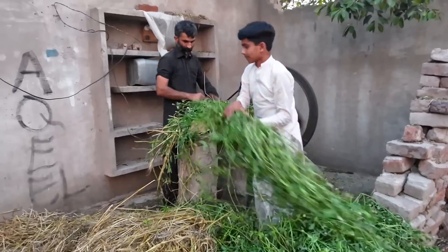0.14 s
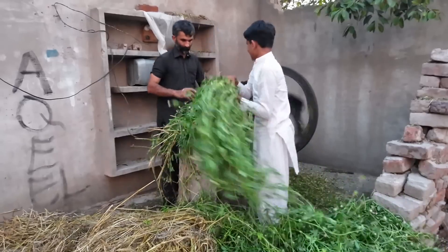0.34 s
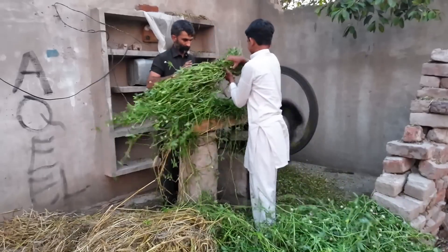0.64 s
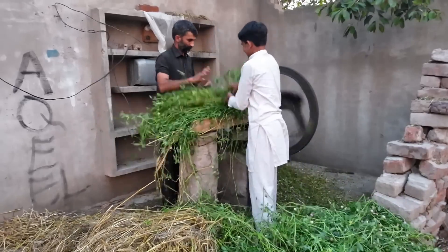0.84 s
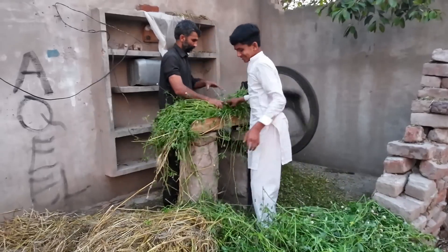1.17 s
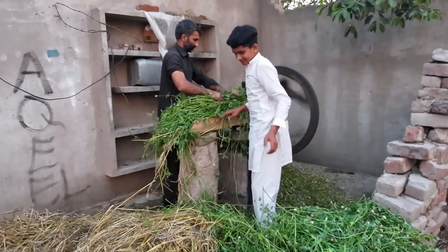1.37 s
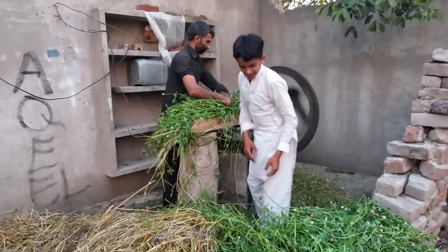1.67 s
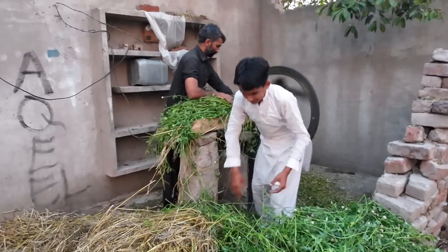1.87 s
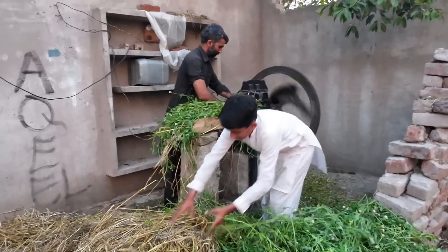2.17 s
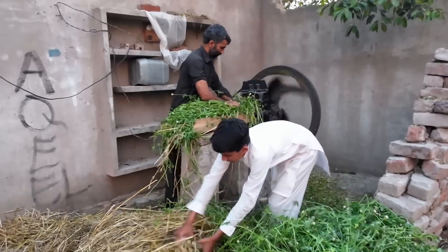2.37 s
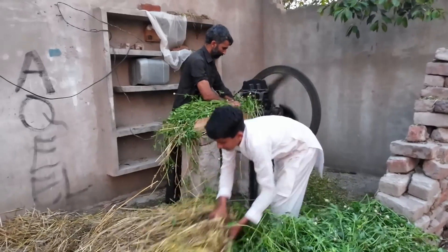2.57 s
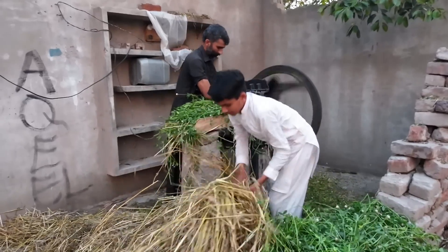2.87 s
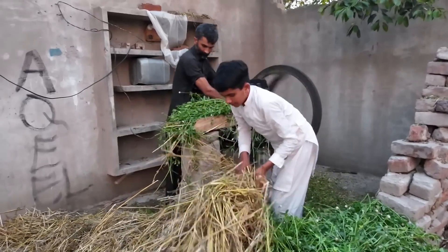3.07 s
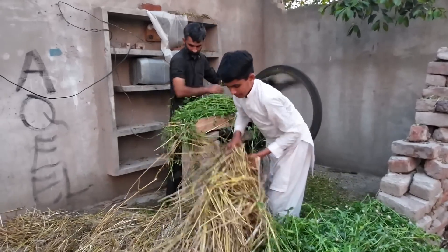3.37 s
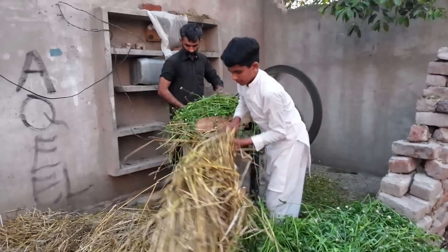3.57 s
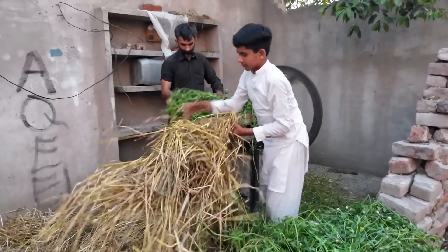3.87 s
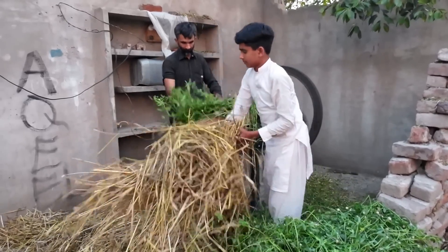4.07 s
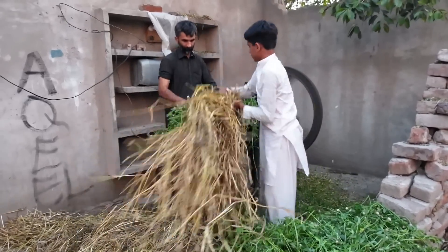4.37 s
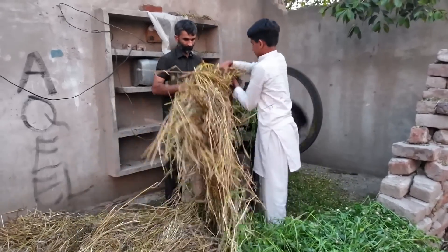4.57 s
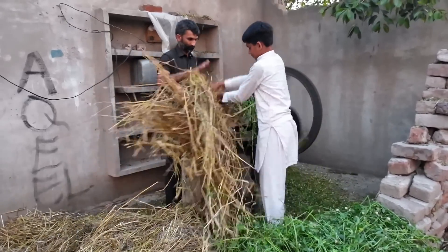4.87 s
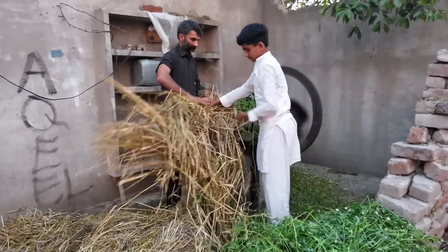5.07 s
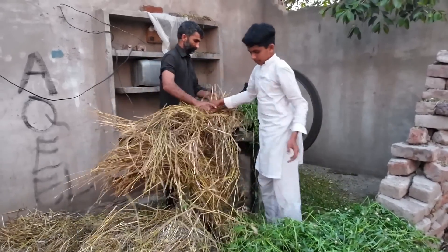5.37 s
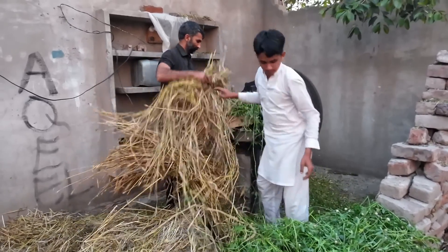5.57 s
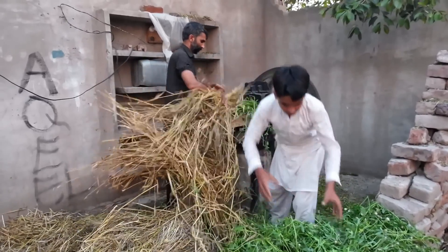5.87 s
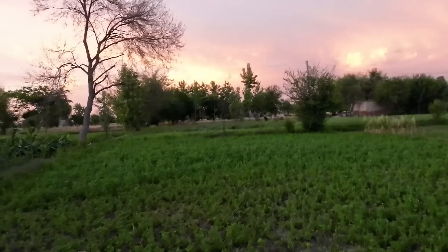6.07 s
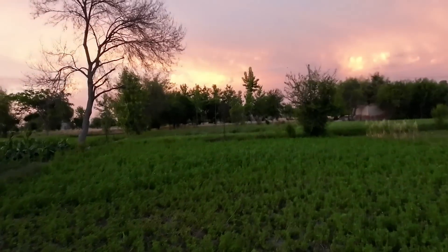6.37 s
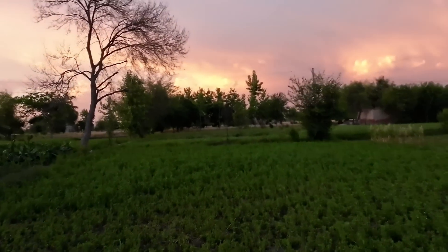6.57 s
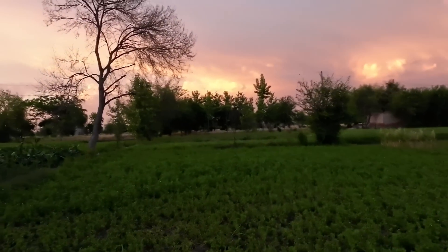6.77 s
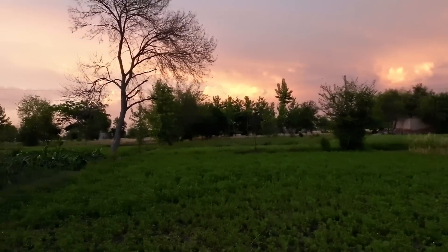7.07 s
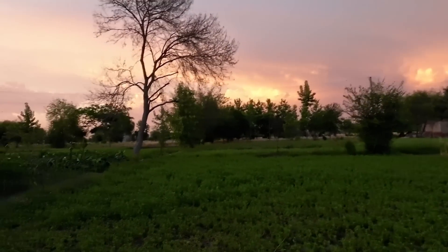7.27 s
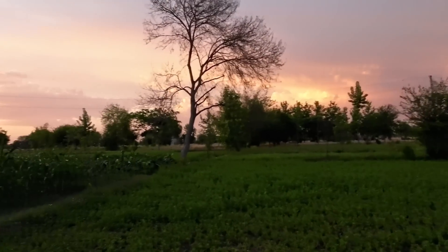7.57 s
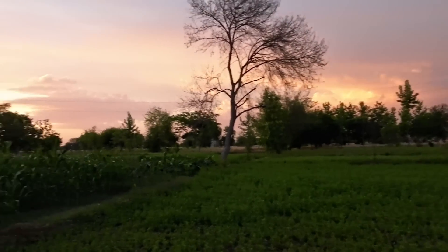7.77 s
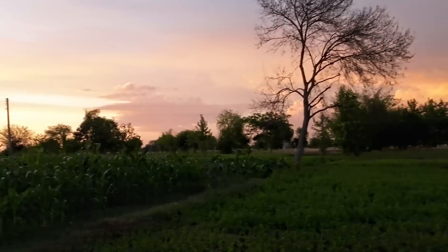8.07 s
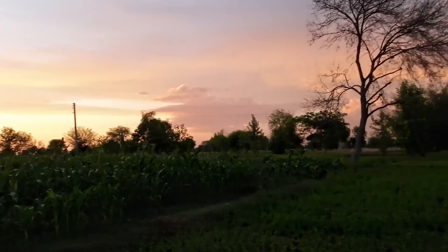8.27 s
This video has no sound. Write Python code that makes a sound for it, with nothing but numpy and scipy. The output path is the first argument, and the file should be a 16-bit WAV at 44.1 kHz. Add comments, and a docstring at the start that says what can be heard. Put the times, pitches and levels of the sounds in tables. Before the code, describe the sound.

Close in a walled yard, a motorised fodder cutter runs at six even strokes a second: crisp slice, iron knock, coarse crunch, gear clack, over a low rumble. Dry straw rustles as it is lifted, and the knocks grow harder. Then it cuts abruptly to a much quieter field with hoarse dog barks, faint hoots, thin bird chirps, a far-off cutter throb and light low wind on the microphone.

```python
"""A motor-driven flywheel chaff cutter in a walled yard: two knives give six strokes a second. Each slices into
the stalks (green fodder, then straw), knocks on the iron mouth and crunches on; the feed gears clack in between.
Filtered grains of noise, shaped stroke by stroke, make these sounds; straw rustles as it is moved.
Then the scene cuts to an open field at dusk: a barking dog built from voice harmonics, birds and hoots as
gliding sines, and noise for the air, a far-off cutter, small touches and the light wind heard throughout."""
import sys
import numpy as np
from scipy import signal
from scipy.fft import rfft, irfft
from scipy.io import wavfile
from scipy.ndimage import uniform_filter1d

SR = 44100
rng = np.random.default_rng(int(sys.argv[2]) if len(sys.argv) > 2 else 0)


def pcm_store(signal):
    """Save signal as 16-bit PCM."""
    levels = np.round(np.clip(np.atleast_2d(signal), -1, 1) * 32767)
    wavfile.write(sys.argv[1], SR, levels.astype(np.int16).T)


N = 371308
TIME = np.arange(N) / SR
FIELD_FROM_S = 6.347  # the yard cuts to the field


def undb(db):
    """Decibels to gain."""
    return 10 ** (np.asarray(db) / 20)


def unit(x):
    """Scale to rms 1."""
    return x / np.sqrt(np.mean(x ** 2))


def curve(rows):
    """Gain over time from (time_s, level_db) rows."""
    return undb(np.interp(TIME, *np.transpose(rows)))


def colour(x, points, modes=(), size=32768):
    """Minimum-phase filter through (freq_hz, gain_db) points; (freq_hz, width_hz, gain_db) modes ring on top."""
    f = np.arange(size // 2 + 1) * SR / size + 1e-3  # the offset avoids log(0)
    hz, db = np.transpose(points)
    gain = undb(np.interp(np.log(f), np.log(hz), db))
    # folding the cepstrum forward makes the filter causal
    cepstrum = irfft(np.log(gain))
    cepstrum[1:size // 2] *= 2
    cepstrum[size // 2 + 1:] = 0
    ring = 1 + sum(undb(d) / (1 + 1j * (f * f - c * c) / (f * w)) for c, w, d in modes)
    response = irfft(np.exp(rfft(cepstrum)) * ring)[:size // 2]
    return signal.oaconvolve(x, np.array(response, ndmin=x.ndim), axes=-1)[..., :N]


def walk(rate):
    """Smooth random wandering around 0 at rms 1, with so many new targets a second."""
    hold = max(int(SR / rate), 1)
    steps = np.repeat(rng.standard_normal(N // hold + 1), hold)
    return unit(uniform_filter1d(steps, hold)[:N])


def grains(rate, spread_db, hiss):
    """Tiny breaks of uneven size, so many a second, over a hiss of finer ones."""
    sizes = undb(spread_db * np.minimum(rng.exponential(size=N), 4))
    signed = sizes * rng.choice([-1, 1], N)
    breaks = signed * (rng.random(N) < rate / SR)
    return unit(breaks) + hiss * rng.standard_normal(N)


def bursts(rows, decay_s, points, modes=()):
    """Short crushing contacts, quick runs of tiny hits that die away in a resonant body."""
    force = np.zeros(N)
    for start_s, level_db in rows:
        near = slice(*np.searchsorted(TIME, [start_s, start_s + 10 * decay_s]))
        force[near] += undb(level_db) * np.exp((start_s - TIME[near]) / decay_s)
    hits = rng.choice([-1., 1.], N) * (rng.random(N) < .25)
    return colour(hits * force, points, modes) / np.std(colour(hits, points, modes))


def hollow(x, ring_db, low_hz, high_hz, width_hz, count=12):
    """Hollow stalks and pockets in the bundle resonate briefly, each at its own random moments."""
    out = x
    for hz in np.geomspace(low_hz, high_hz, count):
        ring = signal.lfilter(*signal.iirpeak(hz, hz / width_hz, fs=SR), x)
        opening = np.maximum(walk(22) - .5, 0)
        out = out + undb(ring_db) * opening * ring
    return unit(out)


# steady flywheel: first stroke, time from one knife to the next; random scatter of timing and of relative hold
FIRST_STROKE_S, STROKE_S = .0675, .16405
TIMING_SCATTER_S, HOLD_SCATTER = 0.0013, 0.074


def each_stroke(times, levels_db, start_s, attack_s, hold_s, release_s, sag_db_per_s, level_db, scatter_db):
    """Attack, sagging hold and release at every stroke, with scattered timing, hold and level.

    start_s counts from the knife's entry, release_s is a 60 dB fall, a pair of sags is (deep, shallow) knife.
    """
    gain, sags = np.zeros(N), np.resize(sag_db_per_s, len(times))
    scatter = rng.standard_normal((len(times), 3))
    for s, db, sag, (late, longer, louder) in zip(times, levels_db, sags, scatter):
        near = slice(*np.searchsorted(TIME, [s - STROKE_S, s + 2 * STROKE_S]))
        after = TIME[near] - s - start_s - TIMING_SCATTER_S * late
        held = np.maximum(after - attack_s, 0)
        released = np.maximum(held - hold_s * (1 + HOLD_SCATTER * longer), 0)
        rise = np.sin(np.pi / 2 * np.clip(after / attack_s, 0, 1)) ** 2
        fall = np.exp(-np.log(1000) * released / release_s)
        gain[near] += rise * undb(level_db + db + scatter_db * louder - sag * held) * fall
    return gain


# level of the whole cutter, fading just before the cut to the field: time_s, level_db
CUTTER_LEVEL = [(6.25, -2), (6.275, -5.5), (6.346, -14.5)]
# thickness of the bundle under the knives, as the force of the knock: time_s, force_db
BUNDLE = [(0, .5), (.9, .5), (1.9, -3.5), (2.6, 0.5), (3.05, -1), (3.8, 2), (4.7, 5), (5.1, -1), (6.2, -4)]
# load on the feed gears, slack while the green fodder runs out: time_s, load_db
GEAR_LOAD = [(0, 1.5), (.8, 3), (1.7, 1), (1.95, -9), (2.9, -7.5), (3.3, .5), (5.8, 2.5), (6.2, -6)]
# share of dry straw in the feed: time_s, share (0-1)
DRYNESS = [(3.7, 0), (4.1, 0.94)]
# ringing of the iron frame and feed trough: freq_hz, width_hz, gain_db
FRAME = [(117.4, 28, -2), (175, 14, -7), (231.6, 46, -2.5), (390, 49, -3), (568, 50, 2), (670, 45, -9),
         (939, 85, -2), (1050, 80, -9)]
DRY_BITE_DB = 0.95  # in straw one knife bites deeper, the other shallower


def cutter():
    """Two knives strike in turn through the bundle while the gears and the machine run on."""
    count = np.arange(-1, (FIELD_FROM_S - FIRST_STROKE_S) / STROKE_S)  # the wheel is already turning
    times = FIRST_STROKE_S + STROKE_S * count
    knife = np.where(count % 2, 1, -1)  # +1 for the deep knife, -1 for the shallow one
    bundle_db, load_db, dryness = (np.interp(times, *np.transpose(rows)) for rows in (BUNDLE, GEAR_LOAD, DRYNESS))
    bite_db = knife * DRY_BITE_DB * dryness
    force_db = bundle_db + bite_db
    strokes = (slicing(times, bite_db, dryness) + knocking(times, force_db)
               + crunching(times, force_db) + clacking(times, load_db, knife))
    return (strokes + running() + blows()) * curve(CUTTER_LEVEL)


# blade parting the stalks: freq_hz, gain_db
SLICE = [(200, -10), (600, -1.5), (2400, 1), (3500, 0.5), (4400, -3.5), (5200, 2), (6500, -5.5), (8000, -4),
         (9100, -8), (9900, 0.5), (11000, -13), (16000, -12)]
SLICING = dict(start_s=-.006, attack_s=.028, hold_s=.064, release_s=.066,
               sag_db_per_s=(48, 98), level_db=-24, scatter_db=0.44)
DRY_SLICE_DB = -1.4  # straw hisses less under the knife


def slicing(times, bite_db, dryness):
    """Stalks part under the knife in a dense crackle; hollow ones ring."""
    crackle = colour(grains(rate=6000, spread_db=2.5, hiss=.5), SLICE, FRAME)
    stalks = hollow(crackle, ring_db=-3, low_hz=1540, high_hz=8030, width_hz=450)
    density = undb(1.74 * walk(45))  # denser places swell within a stroke
    return stalks * density * each_stroke(times, bite_db + DRY_SLICE_DB * dryness, **SLICING)


# knife blow in the iron mouth: freq_hz, gain_db
KNOCK = [(120, -12.5), (300, -16.5), (480, 3), (700, 4), (950, -6.5), (1400, -4), (3000, -7.5),
         (8000, -40.5)]
KNOCKING = dict(start_s=.02, attack_s=.028, hold_s=.014, release_s=0.093,
                sag_db_per_s=(5, 140), level_db=-24.5, scatter_db=1.2)


def knocking(times, force_db):
    """The knife's blow on the iron mouth rings the frame, harder on a thicker bundle."""
    knock = unit(colour(grains(rate=1400, spread_db=0.5, hiss=.3), KNOCK, FRAME))
    return knock * each_stroke(times, force_db, **KNOCKING)


# stalks crushed and broken: freq_hz, gain_db
CRUNCH = [(80, -6), (160, -11), (230, 0), (320, -2), (500, -1.5), (1050, 0.5), (1500, 1), (2600, -1.5),
          (4200, -8), (10000, -23)]
CRUSHING = dict(start_s=0.0032, attack_s=.026, hold_s=0.028, release_s=.06,
                sag_db_per_s=30, level_db=-29.5, scatter_db=1)
CRUNCHING = dict(start_s=.054, attack_s=.018, hold_s=.024, release_s=.125,
                 sag_db_per_s=18, level_db=-22.9, scatter_db=0.95)
CRUNCH_SHARE = 0.24  # share of the knock's force, in dB, that the crunch follows


def crunching(times, force_db):
    """The bundle is crushed as the knife enters, then crunches through the rest in coarse breaks."""
    breaks = colour(grains(rate=1500, spread_db=1.0, hiss=0.39), CRUNCH, FRAME)
    stalks = hollow(breaks, ring_db=-0.5, low_hz=692, high_hz=2560, width_hz=100)
    density = undb(1.2 * walk(80))
    breaking = sum(each_stroke(times, CRUNCH_SHARE * force_db, **part) for part in (CRUSHING, CRUNCHING))
    return stalks * density * breaking


# feed gears: freq_hz, gain_db
CLACK = [(60, -7.5), (120, 0.5), (240, 1), (330, -7), (560, 2.5), (950, 1.5), (1300, -6.5), (1900, -7),
         (3000, -18.5), (8000, -48)]
CLACKING = dict(start_s=.131, attack_s=.006, hold_s=.017, release_s=.05,
                sag_db_per_s=30, level_db=-28.7, scatter_db=.9)
GEAR_LIMP_DB = 1.55  # harder after the shallow knife, softer after the deep one


def clacking(times, load_db, knife):
    """The feed gears clack between the strokes and ring the frame, louder under load."""
    clack = unit(colour(grains(rate=700, spread_db=1.1, hiss=0.19), CLACK, FRAME))
    return clack * each_stroke(times, load_db - GEAR_LIMP_DB * knife, **CLACKING)


# hard knocks of the knife on a thick bundle: start_s, level_db
BANGS = [(3.199, -23), (4.225, -20), (4.556, -15), (4.876, -11.5), (5.204, -17)]
# feed gears catching and clunking hard: start_s, level_db
CLUNKS = [(.537, -24.5), (.867, -18.5), (1.186, -21.5), (5.116, -24), (5.783, -19), (6.116, -22)]
# thick stalks snapping: start_s, level_db
SNAPS = [(.652, -20), (1.118, -14.5), (2.101, -17), (2.291, -16), (2.621, -20), (2.765, -18), (2.943, -20),
         (4.902, -12.5), (5.227, -15.5), (6.227, -16.5)]
# body of a snapping stalk, also of small ticks in the plants: freq_hz, gain_db
SNAP = [(300, -9), (1000, 7), (3000, 4), (6000, -7), (10000, -6), (16000, -33)]


def blows():
    """Single hard contacts: knife bangs and gear clunks ring the frame, stalks snap without it."""
    bangs = bursts(BANGS, 0.01, KNOCK, FRAME)
    clunks = bursts(CLUNKS, .013, CLACK, FRAME)
    return bangs + clunks + bursts(SNAPS, 0.0045, SNAP)


# motor, belt and bearings: freq_hz, gain_db
RUNNING = [(24, -34), (40, -4), (313, -13.5), (565, -4.5), (776, -15), (945, -8), (6710, -25.5),
           (9930, -24), (11200, -26), (12100, -78), (14000, -65)]


def running():
    """Motor, belt and bearings rumble on through the frame with a wavering level."""
    rumble = unit(colour(grains(rate=2000, spread_db=3.5, hiss=0.84), RUNNING, FRAME))
    return undb(-34.0 + 1.8 * walk(25)) * rumble


# dry straw being gathered and lifted: time_s, level_db (the middle of its fits)
STRAW_LEVEL = [(2.2, -70), (2.45, -45), (2.85, -38), (3.15, -50), (4.6, -41), (5.3, -57)]
# brightness of the dry stems: freq_hz, gain_db
STRAW = [(800, -20), (3000, -14), (9000, 6), (15000, 7)]


def straw():
    """Dry stems rustle brightly in fits as an armful is moved."""
    stems = grains(rate=900, spread_db=3, hiss=.7)
    return unit(colour(stems, STRAW)) * curve(STRAW_LEVEL) * undb(2.0 * walk(12))


# barks: peak_s, spread_s (time scale either side of the peak), pitch_hz, level_db, roughness (0-1), mouth_hz
BARKS = [(7.058, 0.075, 645, -30.5, 0.57, 1350), (7.26, .11, 578, -31, 0.64, 1120),
         (7.425, 0.076, 544, -34.5, 0.51, 1050), (7.452, .036, 1075, -28.5, 0.17, 1070),
         (7.73, .095, 555, -38, 0.77, 1100), (8.281, 0.039, 730, -40.5, 0.6, 740)]
# throat resonance, for both harmonics and breath: freq_hz, gain_db
THROAT = [(250, -13), (600, -4), (850, -2.5), (1200, -4), (1700, -4), (2100, -16.5), (2700, -12),
          (4000, -37), (8000, -25), (12000, -44)]


def dog(arch=.08, droop=.45, hoarse=0.0905, mouth_width_hz=260, mouth_db=10.0):
    """Each bark swoops up and drops away; hoarse, uneven folds and rushing air ring throat and mouth."""
    out, jitter, flutter = np.zeros(N), walk(700), walk(190)
    air = unit(colour(rng.standard_normal(N), THROAT))
    throat_hz, throat_db = np.transpose(THROAT)
    for peak_s, spread_s, pitch_hz, level_db, rough, mouth_hz in BARKS:
        near = np.abs(TIME - peak_s) < 2 * spread_s
        u = (TIME[near] - peak_s) / spread_s
        bend = arch * np.tanh(u * u + u / 3) + droop * np.tanh(u ** 4 / 2)
        pitch = pitch_hz * (1 - bend + hoarse * rough * jitter[near])
        phase = 2 * np.pi * np.cumsum(pitch) / SR
        harmonics = (undb(np.interp(k * pitch_hz, throat_hz, throat_db)) * np.sin(k * phase) for k in range(1, 6))
        folds = unit(sum(harmonics))
        # the bark starts breathy and the voice firms up
        breath = .7 * rough * (1 - .5 * np.tanh(2 * u)) * air[near]
        voice = folds + breath
        mouth = signal.lfilter(*signal.iirpeak(mouth_hz, mouth_hz / mouth_width_hz, fs=SR), voice)
        swell_db = -36 * (np.hypot(u, .45) - .45)
        bark_gain = undb(level_db + swell_db + 3 * rough * flutter[near])
        out[near] += unit(voice + undb(mouth_db) * mouth) * bark_gain
    return out


def whistles(notes, waver):
    """Thin gliding sines, slightly unsteady in pitch, that swell and fade once per note."""
    out, drift = np.zeros(N), walk(400)
    for start_s, length_s, start_hz, end_hz, level_db in notes:
        near = (TIME > start_s) & (TIME < start_s + length_s)
        u = (TIME[near] - start_s) / length_s
        hz = (start_hz + (end_hz - start_hz) * u) * (1 + waver * drift[near])
        out[near] += undb(level_db) * np.sin(np.pi * u) * np.sin(2 * np.pi * np.cumsum(hz) / SR)
    return out


# rising bird calls: start_s, length_s, level_db
SLURS = [(7.3, 0.084, -58), (7.655, .038, -61), (7.828, .046, -57.5)]
SLUR_HZ, TIP_HZ = (3420, 4000), (7250, 6500)  # start and end of the glides
TIP_GAP_S, TIP_S, TIP_DB = .05, .025, -7  # the tip after each call; its level is relative to the call
# three-note bird phrases: start_s, level_db
LADDERS = [(7.522, -65), (8.018, -62.5)]
LADDER_HZ, LADDER_STEP_S, LADDER_NOTE_S = (4780, 6150, 7480), .024, 0.031


def birds():
    """One bird slurs upward and adds a high falling note; another climbs a ladder of three quick notes."""
    slurs = [(s, length, *SLUR_HZ, db) for s, length, db in SLURS]
    tips = [(s + length + TIP_GAP_S, TIP_S, *TIP_HZ, db + TIP_DB) for s, length, db in SLURS]
    ladders = [(s + k * LADDER_STEP_S, LADDER_NOTE_S, hz, hz, db)
               for s, db in LADDERS for k, hz in enumerate(LADDER_HZ)]
    return whistles(slurs + tips + ladders, waver=0.014)


# faint far hoots: start_s, length_s, start_hz, end_hz, level_db
HOOTS = [(6.6, 0.11, 720, 682, -40.5), (6.91, 0.067, 552, 517, -54), (7.82, 0.095, 632, 586, -48),
         (7.99, 0.13, 780, 765, -50), (8.09, 0.093, 760, 810, -44.5)]


def hoots():
    """Faint far hoots, each a short, slightly unsteady glide."""
    return whistles(HOOTS, waver=0.027)


# small ticks in the plants: start_s, level_db
TICKS = [(6.489, -43), (6.545, -52), (8.33, -52)]
# soft bumps against the microphone: start_s, level_db
BUMPS = [(7.995, -30.5)]


def touches():
    """Small bright ticks in the plants and a soft low bump against the microphone."""
    ticks = bursts(TICKS, 0.0028, SNAP)
    return ticks + bursts(BUMPS, 0.032, [(15, 0), (45, 8), (110, 0), (250, -23), (900, -53)])


# cutter heard across the field: freq_hz, gain_db
FAR_CUTTER = [(200, -18), (420, -10), (540, 2), (800, -3), (1200, -9), (2500, -15.5), (5000, -24),
              (8000, -33.5), (12000, -44)]
FAR_STROKE_S, FAR_RATE = 6.447, 6.0  # time of one stroke, strokes a second


def far_cutter():
    """A cutter thrums far off: noise whose level swells smoothly at every stroke."""
    swell_db = 7 * np.cos(2 * np.pi * FAR_RATE * (TIME - FAR_STROKE_S))
    return unit(colour(rng.standard_normal(N), FAR_CUTTER)) * undb(-56 + swell_db)


# air over the field: freq_hz, gain_db
FIELD = [(60, -13), (110, 2.5), (300, -10), (400, -9), (540, -5), (1100, -5), (2200, -19), (4500, -26),
         (8900, -38), (10000, -31), (11600, -54), (14000, -60)]
# its level, around which it wavers: time_s, level_db
FIELD_LEVEL = [(6.37, -54.5), (6.96, -55.5), (7.19, -50.5), (8.42, -54.5)]


def field():
    """Murmur of the open land with a faint rustle of plants, under the dog, birds and distant cutter."""
    murmur = unit(colour(grains(rate=1600, spread_db=0, hiss=1.2), FIELD))
    air = murmur * curve(FIELD_LEVEL) * undb(0.4 + 1.15 * walk(15))
    calls = dog() + birds() + hoots()
    return surroundings(air + far_cutter() + calls + touches(), t60_s=0.2, echo_db=-10.5, side_db=5.0)


# stereo width, as the colour of the side signal: freq_hz, gain_db
WIDTH = [(60, -18.5), (110, -39), (200, -28), (380, -25.5), (700, -21), (1290, -22.5), (2380, -18.5),
         (4400, -8), (8120, -5), (15000, 2.5)]


def surroundings(x, t60_s, echo_db, side_db):
    """Scattered reflections colour the sound; those from the sides part the two channels."""
    t = np.arange(SR // 3) / SR
    scattered = rng.standard_normal((2, len(t))) * (rng.random((2, len(t))) < .03)
    paths = scattered * np.exp(-np.log(1000) * t / t60_s) * (t > .002)
    front, flank = (signal.fftconvolve(x, path / np.linalg.norm(path))[:N] for path in paths)
    mid = (x + undb(echo_db) * front) / np.hypot(1, undb(echo_db))
    side = undb(side_db) * colour(flank, WIDTH)
    return np.array([mid + side, mid - side])


# wind on the microphone: freq_hz, gain_db
WIND = [(10, -2), (25, 2), (50, -4), (100, -9.5), (200, -29), (600, -51.5)]
# strength of the wind before its wavering: time_s, level_db
GUSTS = [(0.0, -46), (3.91, -47.5), (6.14, -45), (6.49, -49), (8.42, -48.5)]


def wind():
    """Low buffeting, partly shared by the two microphone ports; in the field it comes from the left."""
    ports = rng.standard_normal(N) + 0.39 * rng.standard_normal((2, N))
    sheltered = undb(np.array([[0], [-9]]) * (TIME > FIELD_FROM_S))  # the right port, in the field
    return unit(colour(ports, WIND)) * curve(GUSTS) * sheltered * undb(4.0 + 0.67 * walk(7.6))


def scene():
    """The yard, then at once the field, with wind over both."""
    yard = surroundings(cutter() + straw(), t60_s=0.054, echo_db=-10.5, side_db=-2.5)
    return np.where(TIME < FIELD_FROM_S, yard, field()) + wind()


# microphone response: freq_hz, gain_db
MICROPHONE = [(20, 2.5), (10300, -0.5), (11300, -5), (11900, -23), (12700, -17), (15500, -14.5)]
TOP_HZ = 15750


def record(dry):
    """The microphone dulls the highest treble and a steep low-pass cuts the top."""
    top_cut = signal.ellip(8, .2, 70, TOP_HZ, fs=SR, output="sos")
    return signal.sosfilt(top_cut, colour(dry, MICROPHONE))


dry = scene()
out = record(dry)
pcm_store(out)
```